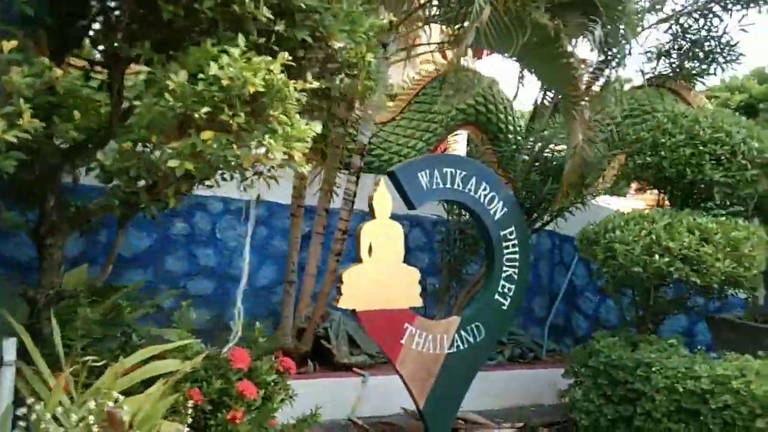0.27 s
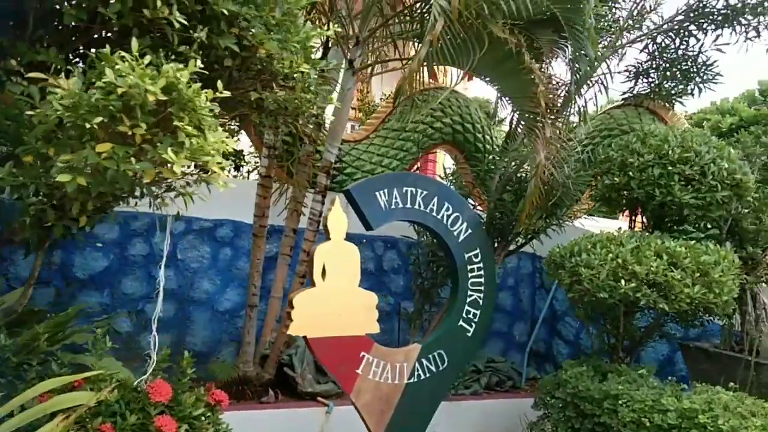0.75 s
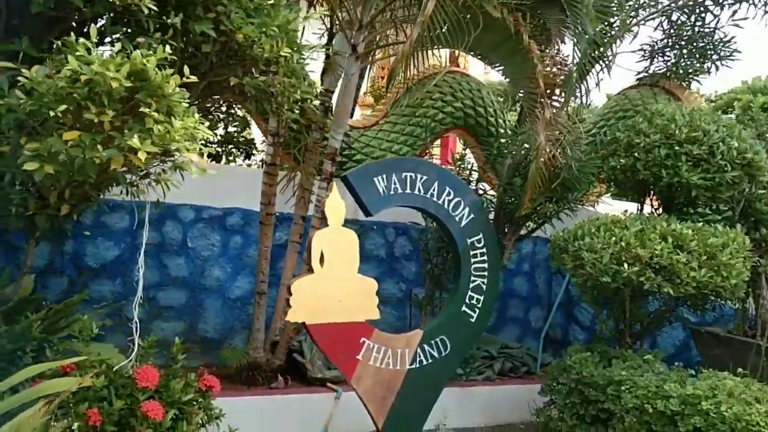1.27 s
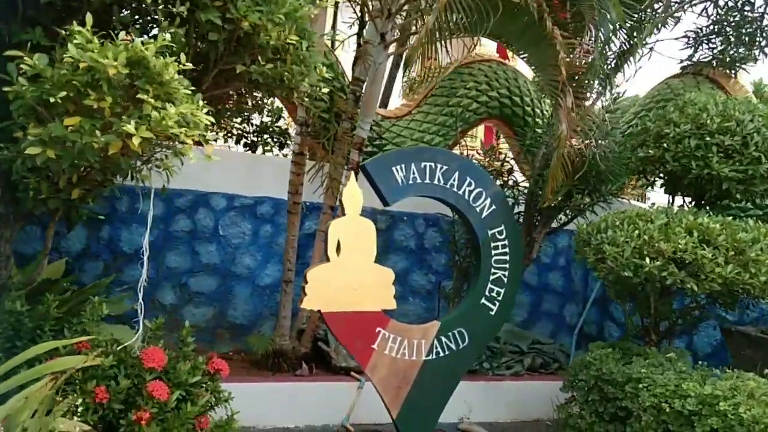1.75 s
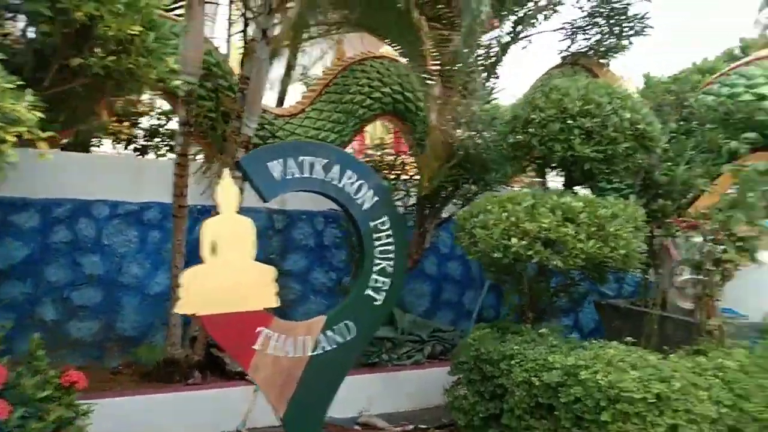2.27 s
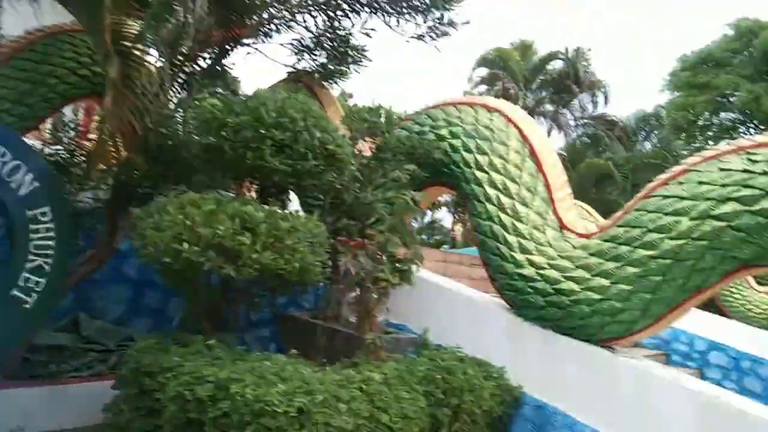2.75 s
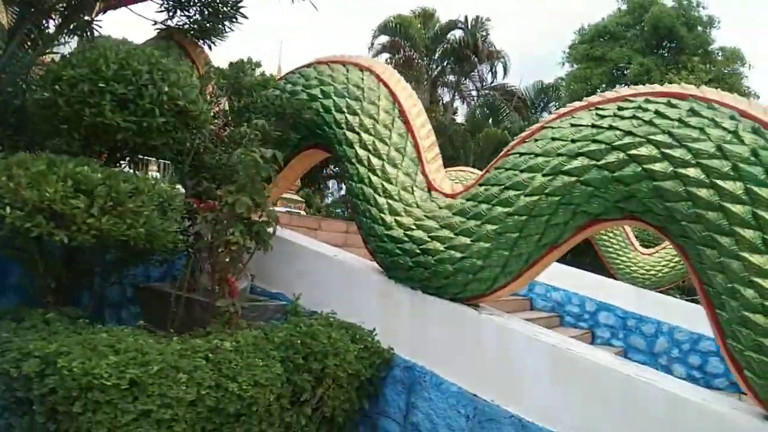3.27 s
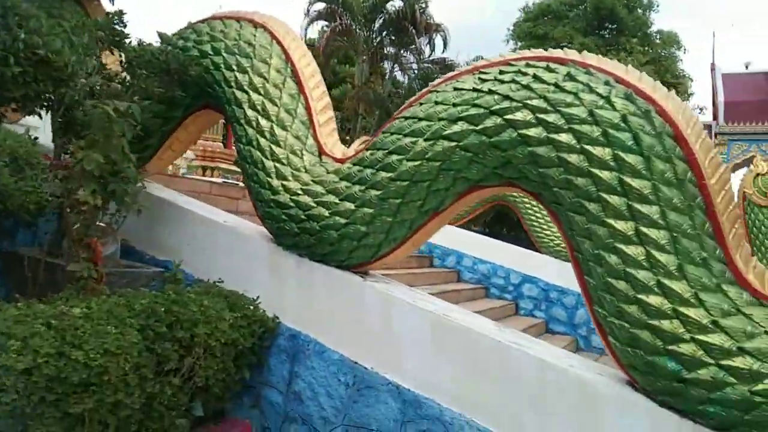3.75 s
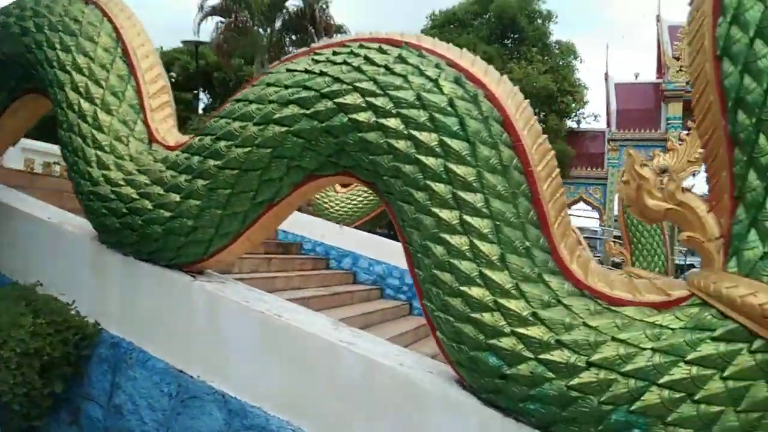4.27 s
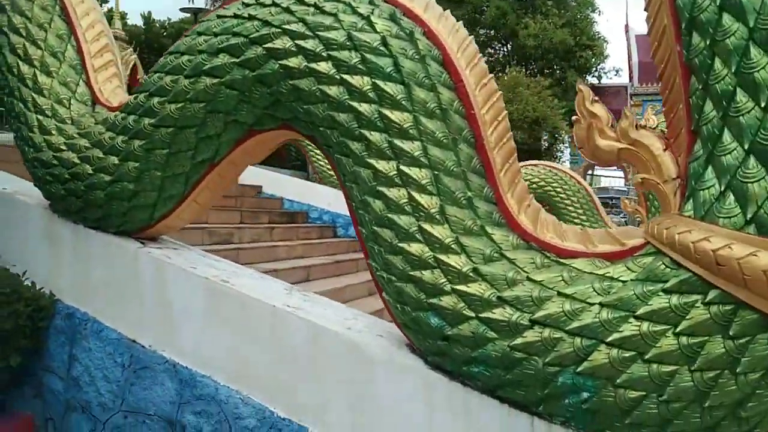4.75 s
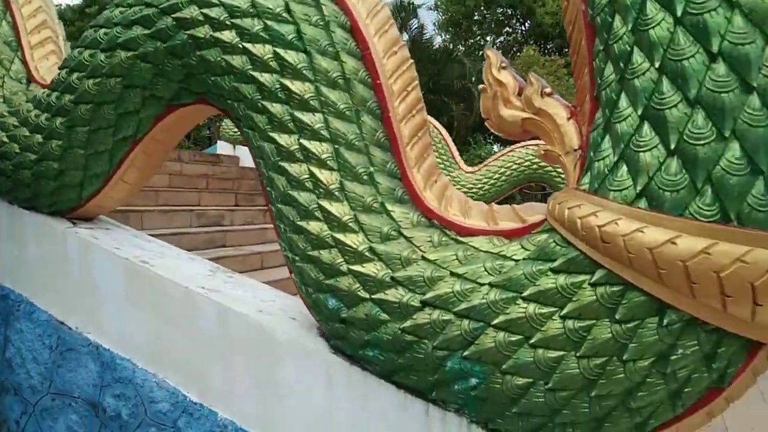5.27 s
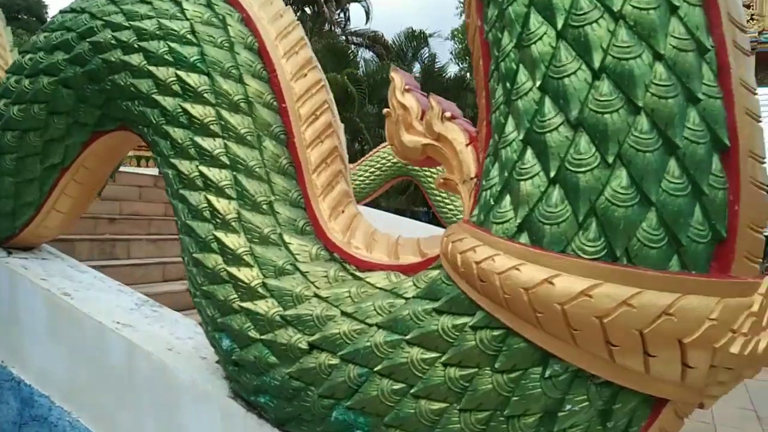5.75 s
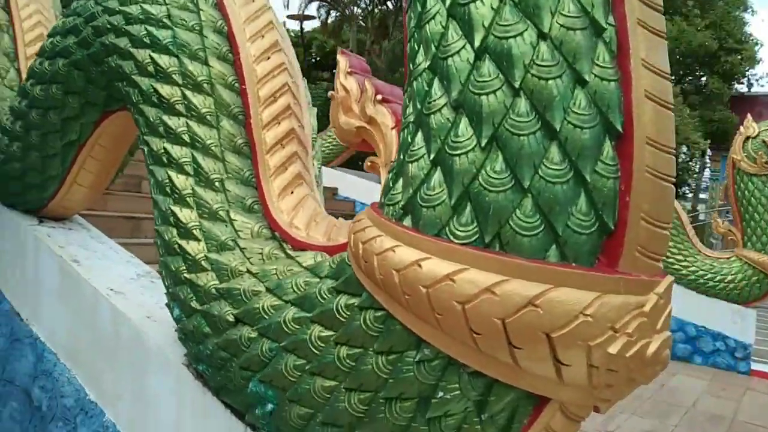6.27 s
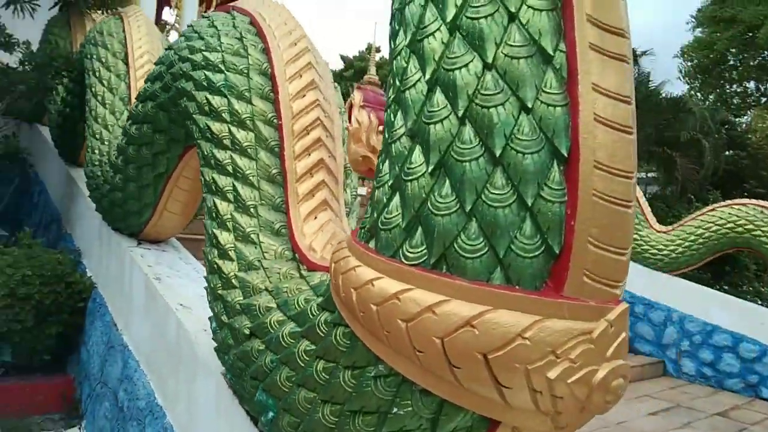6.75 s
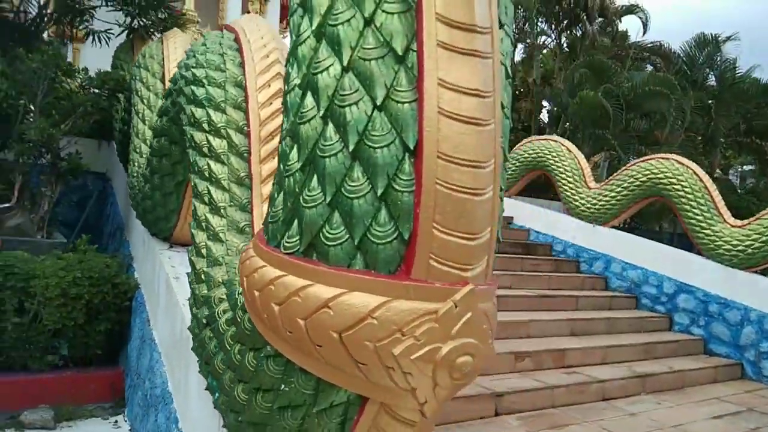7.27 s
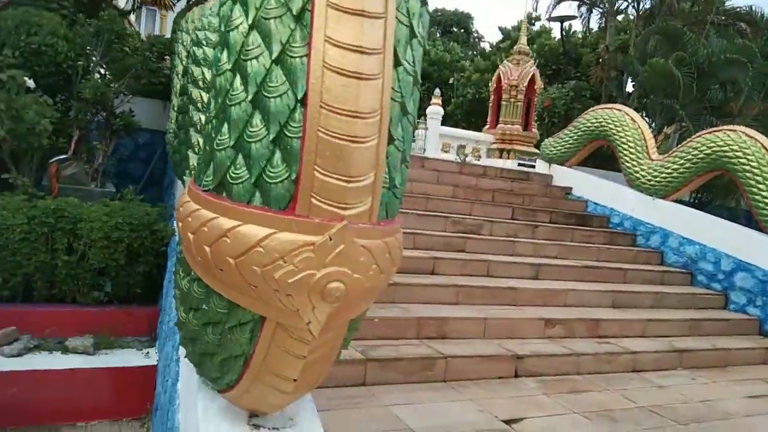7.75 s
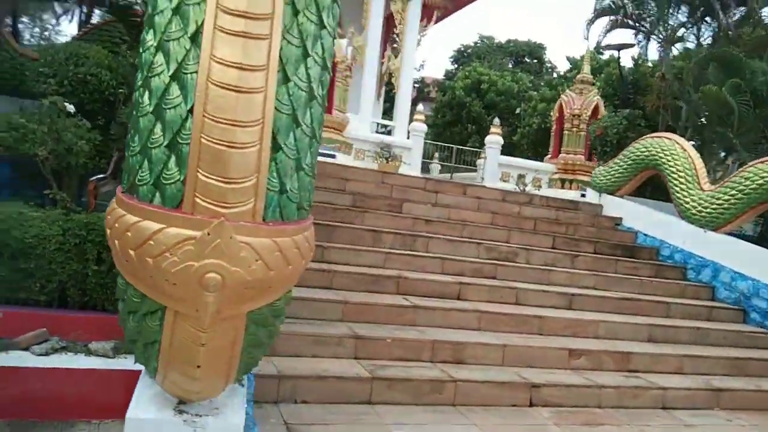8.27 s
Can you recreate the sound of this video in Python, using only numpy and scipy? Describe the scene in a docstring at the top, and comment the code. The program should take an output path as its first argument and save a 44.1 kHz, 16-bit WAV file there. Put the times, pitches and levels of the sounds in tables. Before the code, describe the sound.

Close to the microphone, a small rock fountain spatters, plinks and gurgles outdoors, with fat ringing drops and puffs of wind. Around three seconds a finger rubs the camera and the walker sets off; sharp grit cracks and crunching steps follow while the water dulls and fades. A deep thud knocks the casing near six seconds, then only faint trickle, breeze and a wavering hollow drone remain.

```python
"""A garden with gritty paving: a small rock fountain spatters, plinks and gurgles close to the microphone.
Random tiny impacts make its splash and spray; ringing air pockets make its bubbles and large drops.
Someone carrying a camera walks away, so the water fades behind bursts and cracks of grit under the shoes.
Bumps and finger rubs ring the casing, breeze and puffs rumble on the microphone and a hollow drone wavers.
Faint ticks and pings stay steady; the camera's noise suppressor thins out the quiet parts."""
import sys
import numpy as np
from scipy import signal
from scipy.fft import rfft, irfft
from scipy.io import wavfile
from scipy.ndimage import uniform_filter1d

SR = 44100
rng = np.random.default_rng(int(sys.argv[2]) if len(sys.argv) > 2 else 0)


def unload_audio(sound):
    """Save the sound as a 16-bit wav file, at the path given as the first command line argument."""
    columns = np.transpose(np.atleast_2d(sound))
    # keep every value between -1 and 1, then stretch to whole-number steps
    steps = np.round(np.clip(columns, -1, 1) * 32767)
    wavfile.write(sys.argv[1], SR, steps.astype(np.int16))


N = 375732
TIME = np.arange(N) / SR


def from_db(db):
    """Decibels to amplitude gain."""
    return 10 ** (np.asarray(db) / 20)


def rms_one(x):
    """Scale to unit power."""
    return x / np.sqrt(np.mean(x ** 2) + 1e-20)


def decay(age, t60):
    """Exponential decay that falls 60 dB in t60."""
    return np.exp(-np.log(1000) * age / t60)


def level_over_time(rows):
    """Straight lines between (start_s, level_db) points."""
    start_s, level_db = np.transpose(rows)
    return np.interp(TIME, start_s, level_db)


def drift(rate):
    """Random wavering of unit power, with a new target this many times a second."""
    return rms_one(np.interp(TIME * rate, np.arange(4096), rng.standard_normal(4096)))


def hump(s, half_length):
    """A smooth rise and fall, 1 at time s and 1/e at half_length either side."""
    return np.exp(-np.minimum(((TIME - s) / half_length) ** 2, 50))


def add(track, s, sound):
    """Mix a short sound in at time s."""
    at = int(np.clip(s * SR, 0, N - 1))
    track[at:at + len(sound)] += sound[:N - at]


def swell(s, rise, t60):
    """Rises to 1 at time s, then dies away."""
    out = np.zeros(N)
    age = TIME[:SR] - 4 * rise
    attack = np.exp(-(np.minimum(age, 0) / rise) ** 2)
    add(out, s + age[0], np.where(age < 0, attack, decay(np.abs(age), t60)))
    return out


def colour(x, spectrum, size=8192):
    """Causal (minimum-phase) filter with the given spectrum."""
    hz, db = np.transpose(spectrum)
    bins = np.maximum(np.arange(size // 2 + 1) * SR / size, 1)
    cepstrum = irfft(np.log(from_db(np.interp(np.log(bins), np.log(hz), db))))
    # folding the cepstrum forward gives minimum phase
    cepstrum[1:size // 2] *= 2
    cepstrum[size // 2 + 1:] = 0
    impulse_response = irfft(np.exp(rfft(cepstrum)))
    return signal.oaconvolve(x, impulse_response)[:len(x)]


def hiss(spectrum):
    """Smooth coloured noise of unit power."""
    return rms_one(colour(rng.standard_normal(N), spectrum))


def grains(per_s, spread_db):
    """Random tiny impacts: many small ones and a few large, at unit power."""
    sizes = from_db(spread_db * np.minimum(rng.exponential(1, N), 4.5))
    signs = rng.choice([-1, 1], N)
    struck = rng.random(N) < per_s / SR
    return rms_one(sizes * signs * struck)


def resonate(x, hz, q):
    """A steep-sided resonance: the same peak filter twice, at unit power."""
    b, a = signal.iirpeak(hz, q, fs=SR)
    once = signal.lfilter(b, a, x)
    return rms_one(signal.lfilter(b, a, once))


def ring(modes):
    """Modes struck together, each dying at its own rate."""
    age = TIME[:SR // 2]
    return sum(from_db(db) * np.sin(2 * np.pi * hz * age) * decay(age, t60) for hz, db, t60 in modes)


def bubble(hz, cycles, glide):
    """A trapped air pocket rings and rises in pitch as it nears the surface."""
    life = np.arange(int(cycles / hz * SR) + 2) * hz / SR / cycles   # reaches 1 as it falls 60 dB
    return np.sin(2 * np.pi * cycles * life * (1 + glide * life / 2)) * decay(life, 1)


def bubble_cloud(per_s, low_hz, high_hz, cycles, spread_db, glide):
    """Rising pings born at random at a changing rate, scaled to unit power."""
    out = np.zeros(N)
    born = np.flatnonzero(rng.random(N) < per_s / SR)
    for at, (pitch, size, life) in zip(born, rng.random((len(born), 3))):
        gain = from_db(-spread_db * np.log(size + 0.027)) / np.sqrt(per_s[at])   # rarer bubbles are louder
        hz = low_hz * (high_hz / low_hz) ** pitch
        add(out, at / SR, gain * bubble(hz, cycles * (.5 + life), glide))
    return rms_one(out)


def scatter(x, wet_db, t60):
    """Adds a short noisy tail, as from nearby hard surfaces, which starts after 3 ms."""
    age = TIME[:SR // 3]
    tail = rng.standard_normal(len(age)) * decay(age, t60) * (age > .003)
    wet = from_db(wet_db)
    echoes = signal.fftconvolve(x, tail / np.linalg.norm(tail))[:N]
    return (x + wet * echoes) / np.sqrt(1 + wet ** 2)


# water heard from the walker's distance: start_s, level_db
WATER_LEVEL = [(0.0, -44), (3.08, -47), (3.25, -52), (5.43, -53), (5.6, -58), (6.43, -57.5), (6.64, -55.5),
               (7.0, -59.5), (8.52, -65.5)]
NEAR_DB = -45.5   # the level in that table that counts as beside the basin


def faded_db():
    """How far the water has faded from its level beside the basin."""
    return level_over_time(WATER_LEVEL) - NEAR_DB


HIDDEN_AT_S, HIDING_S = 3.65, .12   # middle and time constant of the basin going out of sight


def hidden():
    """Share of the basin that is out of sight, 0 to 1."""
    return (1 + np.tanh((TIME - HIDDEN_AT_S) / HIDING_S / 2)) / 2


# spatter with the basin in view: pitch_hz, level_db (per Hz)
NEAR_SPLASH = [(1500, -27), (2300, -1.5), (2900, 9.5), (3700, 9), (5000, 10), (5900, 4), (7000, -11),
               (9000, -21), (14000, -55)]
# spatter with the basin out of sight: pitch_hz, level_db (per Hz)
FAR_SPLASH = [(1500, -20), (2400, -28), (3000, 1), (3700, 5.5), (4200, 12), (4800, 15.5), (5400, 10.5),
              (6000, 4.5), (7000, -3.5), (9000, 11.5), (14000, -61.5)]
# fine spray: pitch_hz, level_db (per Hz)
SPRAY = [(4500, -39), (6500, -3.5), (7400, -5.5), (8400, 2), (9200, 1), (10500, -5), (12000, -12),
         (13500, -21), (16000, -23.5)]
# each part of the water: level_db beside the basin, dB lost per dB that the water fades
SPLASH_DB, SPLASH_FADE = -47, 0.53
SPRAY_DB, SPRAY_FADE = -47.5, 0.68
BUBBLES_DB, BUBBLES_FADE = -48.5, .6
CHURN_DB = -56   # short-lived bubbles, faded like the others
HIDDEN_DB = -16   # extra muffling of bubbles out of sight
GUSH_DB, GUSHES_PER_S = -0.67, 17   # the flow surges unevenly
LULL_DB, LULLS_PER_S = 3.5, 14   # bubbles come in clusters with lulls between


def fountain():
    """Water lands in uneven gushes that spatter, throw spray and trap bubbles."""
    far_db, behind = faded_db(), hidden()
    surge_db = GUSH_DB * drift(GUSHES_PER_S)
    gush_db = 0.98 * drift(45) + .5 * surge_db

    near = rms_one(colour(grains(per_s=7000, spread_db=2.5), NEAR_SPLASH))
    far = rms_one(colour(grains(per_s=7000, spread_db=2.5), FAR_SPLASH))
    spatter = near * np.sqrt(1 - behind) + far * np.sqrt(behind)
    splash = spatter * from_db(SPLASH_DB + SPLASH_FADE * far_db + gush_db)
    mist = rms_one(colour(grains(per_s=17000, spread_db=3.0), SPRAY))
    spray = mist * from_db(SPRAY_DB + SPRAY_FADE * far_db + 1.14 * gush_db)

    muffled_db = BUBBLES_FADE * far_db + HIDDEN_DB * behind
    per_s = 900 * from_db(.7 * np.minimum(muffled_db, 3))   # from afar only a few bubbles stand out
    small = bubble_cloud(per_s, low_hz=2082, high_hz=3670, cycles=111, spread_db=11.5, glide=0.232)
    large = bubble_cloud(per_s * .3, low_hz=1527, high_hz=2142, cycles=143, spread_db=10.0, glide=0.165)
    # out of sight, the small bubbles are muffled more than the large
    plinks = from_db(-5.0) * small + from_db(-12.0 + 9.8 * behind) * large
    plinks = plinks * from_db(BUBBLES_DB + muffled_db + surge_db)
    churn = bubble_cloud(per_s * .4, low_hz=1500, high_hz=3600, cycles=24, spread_db=6.0, glide=0.15)
    churn = churn * from_db(CHURN_DB + muffled_db + gush_db)
    lull = rms_one(from_db(LULL_DB * np.minimum(drift(LULLS_PER_S), .5)))
    return splash + spray + scatter(lull * (plinks + churn), wet_db=-4.0, t60=0.11)


TICKS_DB = -63.5
PINGS_PER_S, PINGS_DB = 110, -63.5


def faint_pings():
    """Sparse faint ticks and brief high pings with a short tail, at a steady level."""
    ticks = rms_one(colour(grains(per_s=140, spread_db=7.0), FAR_SPLASH))
    pings = bubble_cloud(np.full(N, PINGS_PER_S), low_hz=2700, high_hz=5400, cycles=110,
                         spread_db=3.0, glide=0.03)
    return scatter(from_db(TICKS_DB) * ticks + from_db(PINGS_DB) * pings, wet_db=-6.0, t60=0.22)


# basin gurgle: pitch_hz, level_db (per Hz)
GURGLE = [(150, -5.5), (240, -3.5), (320, -9), (380, -8), (490, 5.5), (640, 1), (760, -6.5), (860, -48),
          (1400, -19), (2500, -23)]
# basin gurgle at the microphone: start_s, level_db
GURGLE_LEVEL = [(0, -54.5), (.6, -54.5), (2.1, -58.5), (2.4, -64.5), (2.7, -58.5), (3.6, -59.5),
                (4.2, -57.5), (4.6, -60.5), (6.0, -59), (7.0, -61), (7.6, -59.5), (8.52, -62)]
# hollow drone: pitch_hz, level_db (per Hz)
DRONE = [(700, -44), (920, -9), (1030, 0), (1100, 7.5), (1170, -1), (1290, -9.5), (1600, -42)]
# hollow drone at the microphone: start_s, level_db
DRONE_LEVEL = [(0, -57), (1.4, -56.5), (2.2, -59.5), (3.2, -60), (3.5, -61.5), (4.3, -63), (5.3, -63.5),
               (5.5, -52.5), (5.8, -57.5), (6.1, -58), (6.45, -61), (6.58, -56), (6.7, -60), (6.82, -59.5),
               (7.05, -66.5), (7.7, -59), (7.87, -53.5), (8.52, -55.5)]
# outdoor hush: pitch_hz, level_db (per Hz)
AIR = [(100, 2.5), (500, -11), (1500, -14), (2200, -18.5), (4700, -16), (7000, -52), (9200, -5.5),
       (13000, -18), (16000, -42.5)]
AIR_DB = -50
GURGLE_WAVER_DB, DRONE_WAVER_DB = 1.5, 2.4   # typical wavering


def surroundings():
    """Bubbles and coloured noise gurgle in the basin; noise makes a wavering drone and a faint hush."""
    glugs = bubble_cloud(np.full(N, 200.), low_hz=254.4, high_hz=865, cycles=37.4, spread_db=1.0, glide=0.32)
    gurgle = rms_one(colour(glugs, GURGLE)) * 0.86 + hiss(GURGLE) * 1.03
    gurgle_db = level_over_time(GURGLE_LEVEL) + GURGLE_WAVER_DB * drift(9)
    drone_db = level_over_time(DRONE_LEVEL) + DRONE_WAVER_DB * drift(9.2)
    return gurgle * from_db(gurgle_db) + hiss(DRONE) * from_db(drone_db) + hiss(AIR) * from_db(AIR_DB)


# wind rumble on the microphone: pitch_hz, level_db (per Hz)
RUMBLE = [(20, -48), (36, -26), (50, -1.5), (62, 4), (74, -3), (91, 5.5), (112, -6.5), (150, -4.5),
          (200, -27), (400, -47), (1000, -62)]
# breeze between puffs: start_s, level_db
BREEZE = [(0, -60), (1.15, -52), (1.6, -52.5), (2.25, -57.5), (3.4, -53), (3.8, -60.5), (4.3, -55.5),
          (5.35, -54), (5.65, -63), (6.4, -55), (6.9, -59), (8.52, -55.5)]
# puffs of air on the microphone: peak_s, level_db, half_length_s
PUFFS = [(0.115, -45.5, 0.13), (0.517, -43.5, 0.24), (1.004, -48, 0.066), (1.443, -44, 0.12),
         (1.673, -41, 0.046), (1.97, -47.5, 0.2), (2.62, -50, 0.3), (4.21, -52.5, 0.12), (6.562, -48, 0.15),
         (7.102, -53.5, 0.12), (7.362, -51.5, 0.052), (8.003, -52.5, 0.48)]
BREEZE_WAVER_DB = -0.2


def wind():
    """A light breeze rumbles on the microphone, and the power of each puff adds to it."""
    breeze = from_db(level_over_time(BREEZE) + BREEZE_WAVER_DB * drift(3.65))
    puffs = sum((from_db(db) * hump(s, half_length)) ** 2 for s, db, half_length in PUFFS)
    return hiss(RUMBLE) * np.sqrt(breeze ** 2 + puffs)


# large drops in the basin, before echoes: start_s, bubble_db (nominal peak), pitch_hz, slap_db
PLOPS = [(.065, -30, 2400, -50), (0.193, -33, 2870, -34), (0.332, -32.5, 2050, -35),
         (0.536, -34, 1636, -52), (0.618, -33, 2670, -46), (0.694, -37, 2080, -43),
         (0.791, -34.5, 1860, -52), (0.841, -33, 2880, -39), (1.034, -28, 2040, -42),
         (1.148, -34, 1680, -48), (1.224, -33.5, 1470, -34), (1.248, -35.5, 1100, -32),
         (1.284, -32, 1640, -45), (1.476, -31, 2120, -38), (1.654, -30, 3190, -52), (2.12, -31, 2870, -46),
         (2.193, -31.5, 2720, -51), (2.218, -32, 2190, -46), (2.279, -34.5, 2060, -50),
         (2.671, -32, 2740, -35), (2.746, -28, 1815, -34.5), (2.763, -33.5, 2600, -44),
         (3.406, -33.5, 2700, -41.5), (3.492, -31, 2970, -57), (3.912, -38.5, 1646, -61),
         (4.101, -42.5, 2000, -38), (5.641, -45.5, 1740, -65), (6.64, -39, 2000, -58),
         (7.182, -52, 2670, -41), (7.519, -42.5, 2220, -60), (8.029, -44, 2870, -40.5)]
# slap of a drop: pitch_hz, level_db (per Hz)
SLAP = [(700, -27), (1400, -11.5), (2800, 1), (5200, -3), (7000, -21), (14000, -60)]
SLAP_T60_S = 0.022
FROTH_DB, FROTH_Q, FROTH_T60_S = -16, 2.8, 0.14   # froth, level against the bubble
# smaller bubbles each drop throws off: count, level against the bubble, typical delay and pitch spread
SATELLITES, SATELLITE_DB, SATELLITE_DELAY_S, SATELLITE_OCTAVES = 4, -18.5, 0.021, 0.16


def plops():
    """A large drop slaps the surface and leaves a ringing bubble, with froth and smaller bubbles."""
    out, age = np.zeros(N), TIME[:SR // 10]
    smack = hiss(SLAP)
    for s, bubble_db, hz, slap_db in PLOPS:
        slap = smack[int(s * SR):][:len(age)]
        add(out, s, from_db(slap_db) * slap * decay(age[:len(slap)], SLAP_T60_S))
        add(out, s, from_db(bubble_db) * bubble(hz, cycles=46, glide=0.18))
        froth = resonate(rng.standard_normal(len(age)), hz, FROTH_Q)
        add(out, s, from_db(bubble_db + FROTH_DB) * froth * decay(age, FROTH_T60_S))
        for delay, octaves in rng.standard_normal(size=(SATELLITES, 2)):
            satellite = bubble(hz * 2 ** (SATELLITE_OCTAVES * octaves), cycles=40, glide=0.067)
            add(out, s + SATELLITE_DELAY_S * abs(delay), from_db(bubble_db + SATELLITE_DB) * satellite)
    return scatter(out, wet_db=1.0, t60=0.25)


# low gulps of water: peak_s, level_db, pitch_hz
GULPS = [(.17, -54.5, 580), (.35, -53.5, 307), (.43, -52.5, 266), (1.39, -51, 316), (1.642, -48.5, 303),
         (2.071, -46.5, 426), (5.073, -50.5, 348), (5.211, -54, 554), (5.745, -57.5, 845), (7.29, -53, 267),
         (7.77, -50, 329)]
GULP_Q = 4.1   # of each of the two passes through the hollow's resonance


def gulps():
    """Churning water briefly sounds a hollow between the rocks."""
    out, churn = np.zeros(N), hiss(GURGLE)
    for s, db, hz in GULPS:
        hollow = resonate(churn, hz, GULP_Q)
        out += hollow * from_db(db) * swell(s, rise=0.035, t60=0.56)
    return out


# grit cracking under a sole, before echoes: start_s, snap_db (peak), crumble_db
CRACKS = [(.192, -24, -31), (.729, -27, -40), (1.614, -32, -41), (2.864, -40, -41), (3.762, -26, -34),
          (4.441, -31, -45), (4.457, -37, -39), (4.46, -24, -33), (4.4843, -24, -39), (4.527, -33, -35),
          (4.530, -19, -25), (4.537, -39, -48), (4.58, -30, -33), (5.231, -28, -42), (5.3337, -19.5, -39),
          (5.346, -29, -50), (5.846, -42, -43), (5.856, -39, -43), (6.556, -27, -42), (6.7115, -30, -29)]
# crack of grit: pitch_hz, level_db (per Hz)
CRACK = [(1000, -3), (2800, -12.5), (3700, 3), (4800, 9), (6400, -1), (8700, 11.5), (10500, 1),
         (13000, -23), (16000, -9)]
CRUMBLE_T60_S = 0.0074


def cracks():
    """A grain of grit snaps sharply and crumbles for a few milliseconds."""
    out, age = np.zeros(N), TIME[:SR // 50]
    snap = colour(signal.unit_impulse(len(age)), CRACK)
    crumbs = hiss(CRACK)
    for s, snap_db, crumble_db in CRACKS:
        add(out, s, from_db(snap_db) * snap / np.abs(snap).max())
        crumble = crumbs[int(s * SR):][:len(age)] * decay(age, CRUMBLE_T60_S)
        add(out, s, from_db(crumble_db) * crumble)
    return scatter(out, wet_db=-10, t60=0.015)


# bumps on the camera, levels relative to one another: start_s, thud_db, knock_db, rise_s
BUMPS = [(1.38, -57, -64, 0.025), (1.625, -61, -76, 0.0049), (6.127, -31.5, -45, 0.0033),
         (7.74, -43.5, -72, 0.009)]
# noise of the knock: pitch_hz, level_db (per Hz)
KNOCK = [(100, -5), (280, 5), (700, 6.5), (1150, 1), (1450, -11), (1700, -5), (2100, -19), (3200, -13.5),
         (5000, -30), (9000, -32)]
# noise of the thud: pitch_hz, level_db (per Hz)
THUD = [(25, -39), (48, 1), (65, 1.5), (120, -5.5), (170, -7), (230, -17.5), (500, -20), (1100, -24),
        (2500, -55)]
# ring of the casing: pitch_hz, level_db, t60_s
CASING = [(470, -8, .12), (644, 3, 0.33), (740, -2, 0.2), (873, -4, 0.14), (1097, -10, 0.61),
          (1630, -24, 0.17)]
# deep modes of the thud: pitch_hz, level_db, t60_s
THUD_MODES = [(63.2, -6, 0.55), (92.2, 0, 0.55), (130, 1, 0.32), (169, -6, 0.28)]
THUD_LAG_S = 0.02386   # after the knock


def handling():
    """A bump rattles and rings the casing briefly; a deep thud follows just after and lasts longer."""
    knock = sum(from_db(db) * swell(s, rise, t60=0.29) for s, _, db, rise in BUMPS)
    thud = sum(from_db(db) * swell(s + THUD_LAG_S, rise=0.012, t60=0.88) for s, db, _, _ in BUMPS)
    out = hiss(KNOCK) * knock * from_db(12.5) + hiss(THUD) * thud * from_db(-1.5)
    for s, thud_db, knock_db, rise in BUMPS:
        softness = np.exp(-rise / 0.0072)   # soft contacts hardly ring
        add(out, s, ring(CASING) * from_db(knock_db + 8.5) * softness)
        add(out, s + THUD_LAG_S, ring(THUD_MODES) * from_db(thud_db - 2.5))
    return out


# fingers sliding on the casing: peak_s, rub_db, half_length_s, bright_hz (at the peak), octaves_per_s, rasp_db
RUBS = [(3.13, -45, 0.1, 420, 1.8, -45), (5.448, -47.5, 0.09, 610, 19, -70),
        (8.504, -48, 0.03, 860, 5.5, -64)]
# resonances of the rubbed casing: pitch_hz, level_db, q (of each of two passes)
RUB_MODES = [(239, -5, 6.7), (331, -0.5, 3.1), (501, -3.5, 4.6), (627, -3, 4), (900, -5, 4),
             (1100, -4, 12.4), (1280, -11, 11), (1620, -12, 9.6), (1900, -26, 7.4)]
# rasp of a sliding finger: pitch_hz, level_db (per Hz)
RASP = [(700, -16), (1130, 5.5), (1350, -25), (1950, -26), (2250, 11), (2680, 0), (2850, 11), (3020, 8),
        (3400, -11), (3900, 10), (4300, -7), (7000, -22)]
# squeaks of the finger: peak_s, level_db, pitch_hz, width_hz (of each of two passes), rise_s, t60_s
SQUEAKS = [(3.02, -55, 2660, 71, .005, .2), (3.09, -55, 3007, 90, .02, 1.1),
           (5.43, -53.5, 3840, 600, .03, 1.2), (5.485, -51, 2650, 140, 0.018, 0.45),
           (8.47, -52.5, 4020, 260, .004, 0.81)]
RASP_LAG_S = 0.04   # the rasp follows as the finger speeds up
RUB_OCTAVES = 1.17   # spread of the rub around its brightest pitch


def rubs():
    """A finger sticks and slips on the casing; speeding up excites higher resonances, rasps and squeaks."""
    out = np.zeros(N)
    slips = grains(per_s=1800, spread_db=1.5)
    rings = [from_db(db) * resonate(slips, hz, q) for hz, db, q in RUB_MODES]
    rasp = rms_one(colour(slips, RASP))
    for s, db, half_length, bright_hz, octaves_per_s, rasp_db in RUBS:
        bright = np.log2(bright_hz) + octaves_per_s * np.clip(TIME - s, -half_length, half_length)
        rub = sum(mode / (1 + ((np.log2(hz) - bright) / RUB_OCTAVES) ** 2)
                  for mode, (hz, _, _) in zip(rings, RUB_MODES))
        out += from_db(db) * rms_one(rub) * hump(s, half_length)
        out += from_db(rasp_db) * rasp * hump(s + RASP_LAG_S, 1.1 * half_length)
    for s, db, hz, width_hz, rise, t60 in SQUEAKS:
        out += from_db(db) * resonate(slips, hz, hz / width_hz) * swell(s, rise, t60)
    return out


# soles scuffing grit: full_pressure_s, rise_s, level_db, drag_s, t60_s
SCUFFS = [(3.765, 0.0073, -40.5, 0.02, 0.59), (4.45, 0.014, -41, 0.075, 0.5),
          (4.58, 0.008, -52, 0.026, 0.28), (5.27, 0.3, -55, .01, 0.9), (5.852, 0.02, -44, .05, 0.58),
          (6.535, 0.016, -41.5, 0.046, 0.42)]
# grit under a sole: pitch_hz, level_db (per Hz)
GRIT = [(300, -24), (900, -2), (1900, -0.5), (2500, -5.5), (3500, 7), (4800, 4.5), (6400, -2), (8700, 11.5),
        (10500, 0.5), (13000, -9), (16000, -16)]


def footsteps():
    """Each sole drags a burst of grit over the paving and lifts; the grains give way in clumps."""
    pressure = np.zeros(N)
    for s, rise, db, drag, t60 in SCUFFS:
        press = np.where(TIME < s, hump(s, rise), 1)
        lift_db = -60 * np.clip((TIME - s - drag) / t60, 0, 3)
        pressure += from_db(db + lift_db) * press
    clumps = grains(per_s=9000, spread_db=4.0) * from_db(4.2 * drift(300))
    crunch = scatter(clumps, wet_db=-6.5, t60=0.092)
    return pressure * rms_one(colour(crunch, GRIT))


def scene():
    """Everything at the one microphone."""
    water = fountain() + plops() + gulps()
    background = faint_pings() + surroundings() + wind()
    walker = cracks() + handling() + rubs() + footsteps()
    return (water + background + walker)[None]


SMOOTH_ABOVE_HZ = 5500   # above this the suppressor works in broad bands


def suppress(x, depth_db, margin_db):
    """Turns down each frequency near its own quietest level, the treble in broad bands."""
    hz, _, spec = signal.stft(x, fs=SR, nperseg=1024, noverlap=768)
    power = uniform_filter1d(np.abs(spec) ** 2, size=3, axis=1)
    power = uniform_filter1d(power, size=7, axis=2)
    floor = np.percentile(power, 15, axis=2, keepdims=True)
    floor = uniform_filter1d(floor, size=5, axis=1)
    cut = 1 / (1 + (power / (floor * from_db(margin_db) ** 2 + 1e-20)) ** 2)
    fine = from_db(depth_db * cut)
    broad = np.sqrt(np.abs(uniform_filter1d(fine ** 2, size=19, axis=1)))
    gain = np.where(hz[:, None] > SMOOTH_ABOVE_HZ, broad, fine)
    return signal.istft(spec * gain, nperseg=1024, noverlap=768)[1][:, :N]


CUTOFF_HZ = 15750


def record(dry):
    """Noise suppression, then the deepest bass and the top are cut."""
    quiet = suppress(dry, depth_db=-24.5, margin_db=1.0)
    bass_cut = signal.butter(2, 32, "high", fs=SR, output="sos")
    top_cut = signal.ellip(12, .1, 70, CUTOFF_HZ, fs=SR, output="sos")
    return signal.sosfilt(top_cut, signal.sosfilt(bass_cut, quiet))


dry = scene()
out = record(dry)
unload_audio(out)
```